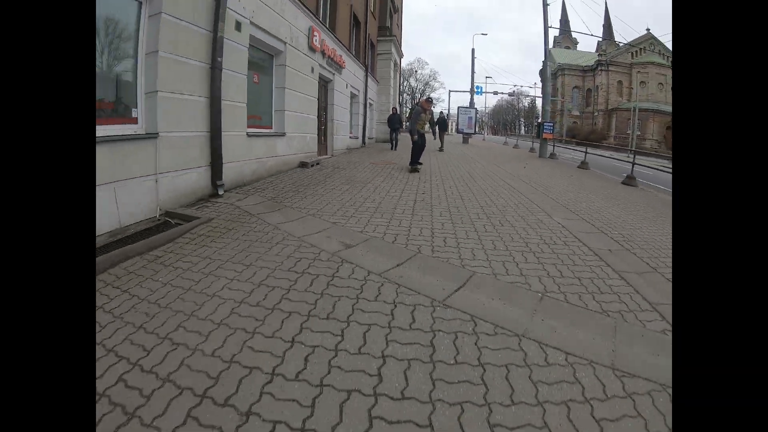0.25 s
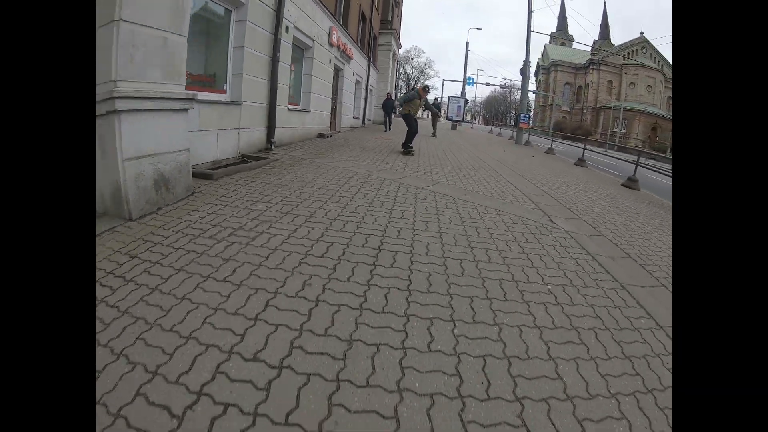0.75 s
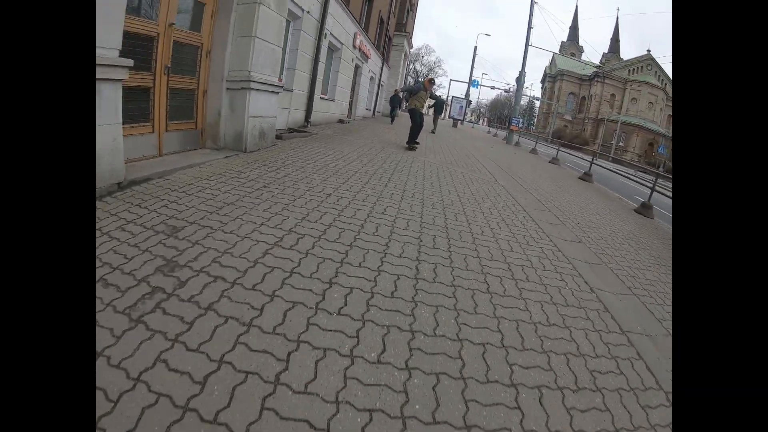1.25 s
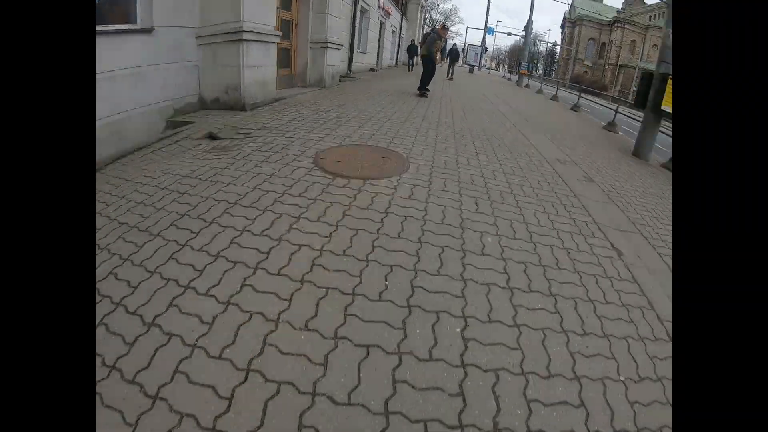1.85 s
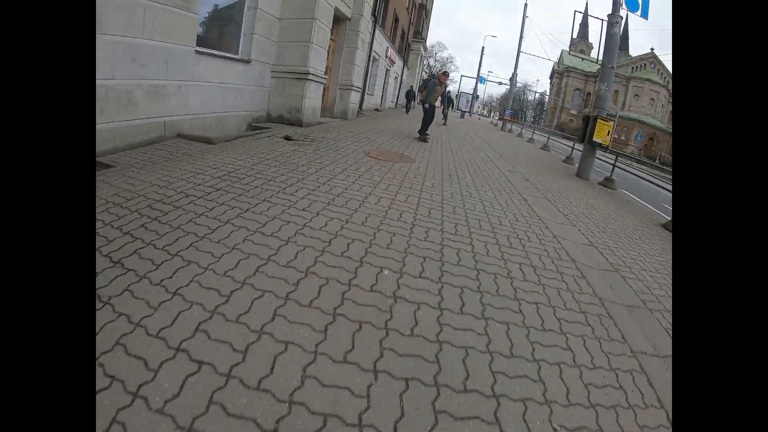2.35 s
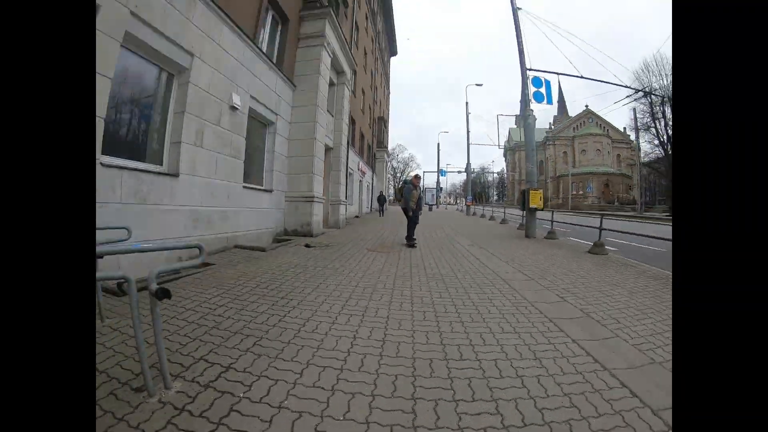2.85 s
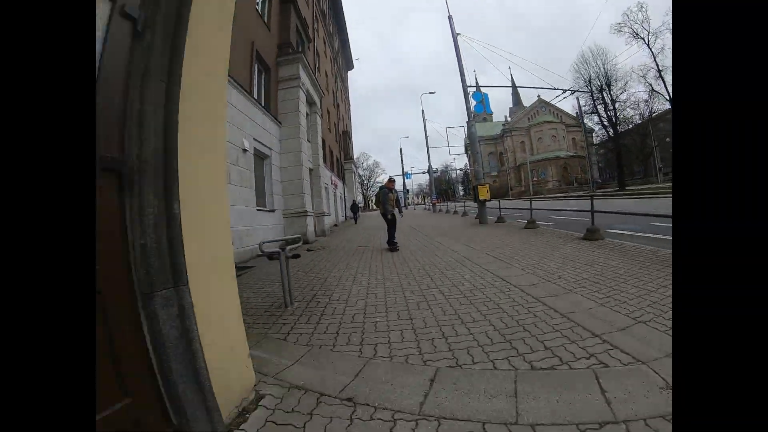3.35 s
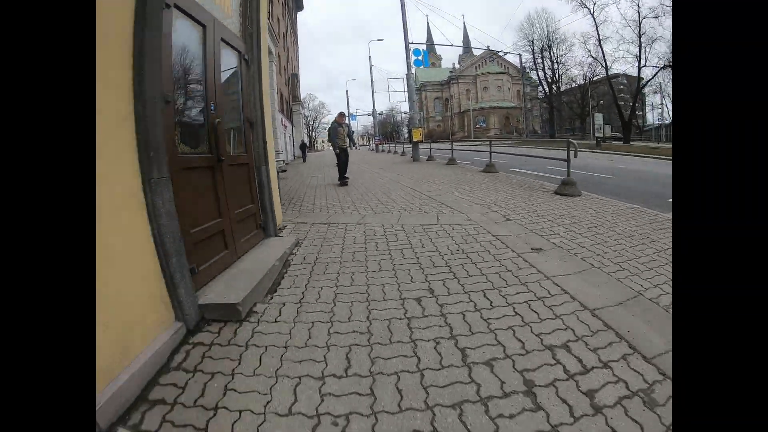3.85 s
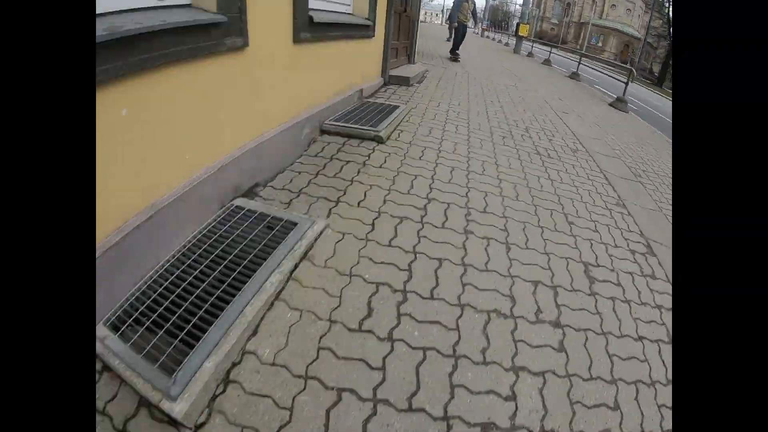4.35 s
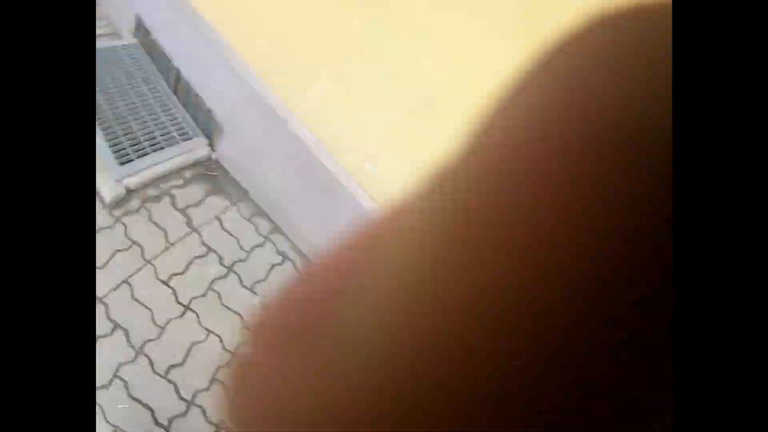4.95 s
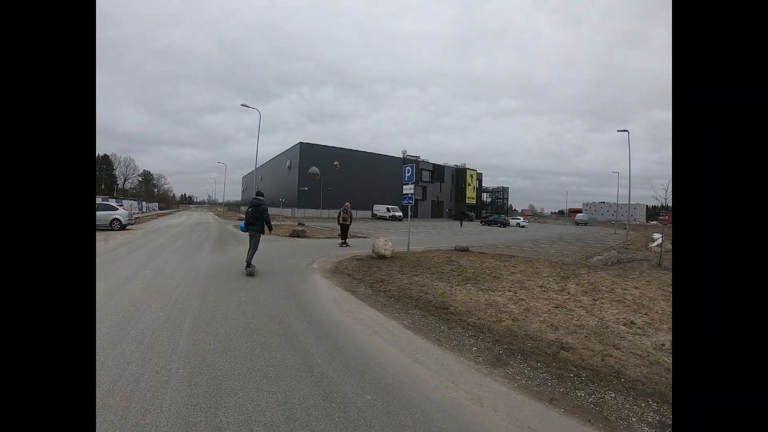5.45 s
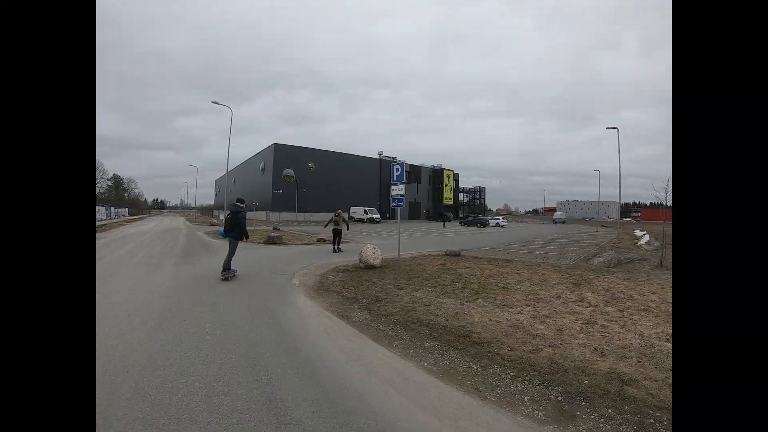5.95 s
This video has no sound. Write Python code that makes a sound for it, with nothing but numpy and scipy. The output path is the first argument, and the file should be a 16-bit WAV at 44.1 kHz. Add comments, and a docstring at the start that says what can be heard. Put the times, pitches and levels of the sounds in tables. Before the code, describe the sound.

Skateboard wheels rattle and roar fast over sidewalk pavers, fingers thump and muffle the microphone, then brief silence and smoother, quieter rolling on asphalt.

```python
"""Skateboard on pavers, then asphalt

A board rolls over concrete pavers, heard from the rider's hand: struck modes clack at the joints, shaped noise
roars, crackles and buffets, and resonances drum. Fingers thump and scrape the microphone housing as the
hand closes and the clatter dies away. After a short silence a board rolls on asphalt in mono: smoother
noise, with bumps, pings and a thin whistle.
"""
import sys
import numpy as np
from scipy import signal
from scipy.fft import rfft, irfft, next_fast_len
from scipy.io import wavfile
from scipy.ndimage import uniform_filter1d

SR = 44100
rng = np.random.default_rng(int(sys.argv[2]) if len(sys.argv) > 2 else 0)


def unload_audio(sound):
    """Save the sound as a 16-bit wav file, at the path given as the first command line argument."""
    columns = np.transpose(np.atleast_2d(sound))
    # keep every value between -1 and 1, then stretch to whole-number steps
    steps = np.round(np.clip(columns, -1, 1) * 32767)
    wavfile.write(sys.argv[1], SR, steps.astype(np.int16))


N = 273861
TIME = np.arange(N) / SR
CUT_S, RESUME_S = 5.152, 5.235   # pavers end, asphalt begins
TRAVEL_S = 0.0008   # mean delay from blow to sound

# hardest hits on raised paver joints: start_s, relative_clack_db, relative_crack_db
JOINTS = [(0.048,-11.5,-48), (0.13,-15,-51), (0.201,-14,-38), (0.252,-15,-45), (0.302,-18.5,-44),
          (0.483,-13.5,-48), (0.562,-15,-37), (0.59,-10,-41), (0.774,-12.5,-39), (0.832,-15,-44),
          (0.853,-12.5,-48), (0.88,-14.5,-54), (0.987,-11.5,-50), (1.043,-14.5,-48), (1.093,-12,-54),
          (1.147,-15,-51), (1.197,-12,-51), (1.22,-14.5,-43), (1.247,-13.5,-35), (1.296,-14,-38),
          (1.319,-11,-37), (1.348,-15.5,-44), (1.398,-13,-54), (1.449,-14,-34), (1.5,-14.5,-45),
          (1.55,-16,-33), (1.714,-14.5,-47), (1.766,-13,-51), (1.818,-17,-54), (1.925,-16.5,-40),
          (2.082,-12.5,-43), (2.161,-17,-36), (2.343,-14,-49), (2.373,-17.5,-48), (2.405,-10,-38),
          (2.446,-14,-45), (2.498,-11,-36), (2.556,-12.5,-45), (2.658,-9.5,-56), (2.762,-14.5,-48),
          (2.872,-11,-33), (2.91,-13,-43), (2.964,-14.5,-39), (3.246,-11.5,-41), (3.348,-9,-38),
          (3.398,-18,-46), (3.552,-15.5,-52), (3.707,-15,-49), (3.806,-16,-52), (3.855,-11,-43),
          (3.907,-14,-38), (3.959,-14.5,-42), (4.01,-14.5,-54), (4.112,-11.5,-39), (4.19,-11,-48),
          (4.255,-7.5,-37), (4.559,-14,-32), (4.611,-6.5,-47), (4.645,-11.5,-53)]
# rolling noise spectrum: frequency_hz, relative_density_db
ROLL_COLOUR = [(50, -10), (110, -2), (160, 0.5), (215, -4), (290, -2.5), (350, -9.5), (520, -9), (720, -10),
               (890, -6.5), (1230, -17), (1540, -16), (2000, -24), (2600, -39), (4500, -63.5)]


def from_db(db):
    """Decibels to amplitude gain."""
    return 10 ** (np.asarray(db) / 20)


def rms_one(x):
    """Scale to unit power."""
    return x / np.sqrt(np.mean(x ** 2) + 1e-20)


def gains(rows):
    """The dB columns of a timed curve as gains at every sample."""
    s, *columns = np.transpose(rows)
    return [from_db(np.interp(TIME, s, column)) for column in columns]


def at_hz(points, hz):
    """Interpolate a table on a log-frequency axis."""
    f, value = np.transpose(points)
    return np.interp(np.log(hz), np.log(f), value)


def ramp(t, start_s, length_s):
    """Linear rise from 0 to 1."""
    return np.clip((t - start_s) / length_s, 0, 1)


def drift(rate_hz):
    """Smooth random wander of unit power: noise through a double pole, at a reduced sample rate."""
    step, settle = 40, 2000
    pole = np.exp(-2 * np.pi * rate_hz * step / SR)
    white = rng.standard_normal(N // step + settle + 2)
    slow = signal.lfilter([1], [1, -2 * pole, pole * pole], white)[settle:]
    return np.interp(np.arange(N) / step, np.arange(len(slow)), rms_one(slow))


def lowpass(x, hz):
    """Second-order low-pass."""
    return signal.sosfilt(signal.butter(2, min(hz, .45 * SR), fs=SR, output="sos"), x + 1e-18)


def ring(force, hz, t60_s):
    """A two-pole mode: a unit click starts a decaying sine of initial height 1."""
    radius = from_db(-60 / (t60_s * SR))
    angle = 2 * np.pi * hz / SR
    return signal.lfilter([0, np.sin(angle)], [1, -2 * radius * np.cos(angle), radius ** 2], force + 1e-18)


def resonance(x, hz, width_hz):
    """A fixed band-pass resonance, at unit power."""
    return rms_one(signal.lfilter(*signal.iirpeak(hz, hz / width_hz, fs=SR), x))


def gliding(x, hz, width_hz):
    """A resonance whose centre moves: one pole in a rotating frame, at unit power."""
    turn = np.exp(2j * np.pi * np.cumsum(hz) / SR)
    slow = signal.lfilter([1], [1, -np.exp(-np.pi * width_hz / SR)], x / turn)
    return rms_one((turn * slow).real)


def clicks(times, sizes):
    """A train of single-sample blows."""
    out = np.zeros(N)
    np.add.at(out, np.clip(np.round(times * SR).astype(int), 0, N - 1), sizes)
    return out


def fading(blows, decay_s):
    """Each blow leaves an exponential tail."""
    return signal.lfilter([1], [1, -np.exp(-1 / (decay_s * SR))], blows + 1e-18)


def pan(lean_db):
    """Left and right gains of unit mean power from a left-right level difference."""
    g = from_db(np.array([[.5], [-.5]]) * lean_db)
    return g / np.sqrt(np.mean(g ** 2, axis=0))


def noise(spectrum, envelope=1, stereo=True):
    """Enveloped white noise, then coloured; channels partly alike, at unit power."""
    # channel correlation: frequency_hz, likeness_ratio
    likeness = [(50, 0.25), (100, 0.35), (200, 0.86), (520, 0.97), (850, 0.6), (1500, 0.43), (2300, 0.19),
                (6500, 0.25)]
    size = next_fast_len(N)
    hz = np.maximum(np.arange(size // 2 + 1) * SR / size, 1)
    mid, side = rfft(rng.standard_normal((2, N)) * envelope, size) * from_db(at_hz(spectrum, hz))
    if stereo:
        alike = np.clip(at_hz(likeness, hz), -1, 1)
        mid = np.sqrt(1 + alike) * mid + np.sqrt(1 - alike) * side * [[1], [-1]]
    return rms_one(irfft(mid, size)[..., :N])


def strike(times, level_db, scatter_db, contact_hz):
    """A blow pushes all board modes one way; bending waves reach each at its own moment and strength."""
    # board modes: frequency_hz, relative_level_db, t60_s
    board = [(144.4, -10.5, 0.06), (284, -14, 0.034), (469, -9.5, 0.036), (650, -8, 0.036),
             (828, 0.5, 0.017), (960, -4, 0.014), (1466, -7.5, 0.011), (2060, -12, 0.0036)]
    travel_spread_s = .00014
    out, sign = np.zeros(N), np.sign(rng.standard_normal(len(times)))
    for hz, mode_db, t60_s in board:
        strength, travel = rng.standard_normal((len(times), 2)).T
        sizes = from_db(level_db + mode_db + scatter_db * strength) * sign
        arrivals = times + TRAVEL_S + travel_spread_s * travel
        out += ring(clicks(arrivals, sizes), hz, t60_s)
    return lowpass(out, contact_hz)


def pavers():
    """Joints ring the board in clacks and rebounds; each blow swells the roar, drumming, rasp and grit."""
    # steady roar colour shared above; grit spectrum: frequency_hz, relative_density_db
    grit_colour = [(2500, -16), (3900, -9.5), (5000, -2.5), (6100, 2.5), (7000, -2.5), (8000, -10.5),
                   (10000, -19), (14000, -47.5)]
    # rougher and smoother paving: start_s, hiss_change_db
    surface_curve = [(0.03, 2.5), (0.3, -1), (0.6, 5), (0.78, 3), (0.9, -1), (1.05, 0), (2.05, 3.5),
                     (2.7, 2.5), (3.1, 3), (4.03, -0.5), (4.35, 4)]
    # loose grains on the paving: start_s, crackle_db
    crackle_curve = [(0, -51.5), (1.4, -78), (2.8, -66.5), (3.0, -57), (3.13, -45), (3.26, -63),
                     (3.48, -48.5), (3.7, -54.5), (4.8, -55.5)]
    # wheels' rasp around 2-3 kHz: start_s, level_db
    rasp_curve = [(0, -51), (1.1, -48), (1.5, -50), (2.2, -47), (2.75, -52), (2.85, -48.5), (3.3, -45.5),
                  (3.55, -51), (4.1, -48.5), (4.55, -48), (4.8, -46)]
    # hand dropping and closing: start_s, clatter_change_db, hiss_change_db
    cover_curve = [(4.25, -1, -1.5), (4.6, -5, -1.5), (4.66, -7, -3.5), (4.73, -16.5, -11.5),
                   (4.84, -17, -9.5), (4.91, -25.5, -17), (5.0, -37, -23), (5.07, -43, -15),
                   (5.13, -31, -21)]
    rasp_colour = [(1200, -15.5), (2100, 0.0), (3100, -1.0), (4200, -13.0), (7000, -38.0)]
    roar_db, grit_db = -23.5, -47   # before surface and hand changes
    roar_follows = 0.79   # share of the surface swing
    gap_db, gap_s = -6, 0.0077   # a wheel is unloaded crossing the gap before a hard edge
    drop_s, drop_time_s = 4.04, 0.16   # the hand drops towards the deck
    clack_drop_db, roar_drop_db = -5.5, -1.3

    hard, hard_db, _ = np.transpose(JOINTS)
    light, light_db = light_joints(hard)
    times, blow_db = np.append(hard, light), np.append(hard_db, light_db)
    heard_db = blow_db + clack_drop_db * ramp(times, drop_s, drop_time_s)
    clacks = strike(times, heard_db + 1.0, scatter_db=0.5, contact_hz=2000)
    rebound_times = times + rng.uniform(0.00097, 0.00455, len(times))
    rebounds = strike(rebound_times, heard_db - 7.5, scatter_db=3.5, contact_hz=1790)

    jolt = fading(clicks(times, from_db(blow_db - blow_db.mean())), decay_s=0.0014)
    climb = uniform_filter1d(jolt, int(0.0051 * SR))   # a wheel takes a moment to ride over the edge
    gap = fading(clicks(hard, np.ones(len(hard)))[::-1], decay_s=gap_s)[::-1]   # grows towards the edge
    load = rms_one((1 + 2.5 * climb) * from_db(1.66 * drift(25) + gap_db * gap))
    surface, = gains(surface_curve)
    roar_level = from_db(roar_db + roar_drop_db * ramp(TIME, drop_s, drop_time_s)) * surface ** roar_follows
    roar = roar_level * noise(ROLL_COLOUR, load)

    crunch = (1 + 1.3 * climb) * from_db(2.6 * drift(22) + 1.9 * drift(350))
    grit = from_db(grit_db) * noise(grit_colour, crunch)
    crackle = gains(crackle_curve)[0] * crushed_grains(crunch)
    rasp = gains(rasp_curve)[0] * noise(rasp_colour, crunch)

    clatter_gain, hiss_gain = gains(cover_curve)
    clatter = clacks + rebounds + rattle() + roar + deck(load) + boom(load)
    return clatter_gain * clatter + hiss_gain * surface * (rasp + grit + crackle)


def light_joints(hard):
    """Joints between hard hits come at a near-steady pace, weak and strong in turn."""
    joints_per_s, jitter_s = 38.7, .0007   # pavers are not laid quite evenly
    light_db, alternate_db, uneven_db = -19, 1.5, 1.1
    steps = np.maximum(np.round(np.diff(hard) * joints_per_s), 1).astype(int)
    rows = []
    for a, b, n in zip(hard, hard[1:], steps):
        rows += [(a + (b - a) * k / n, (-1) ** k) for k in range(1, n)]
    times, turn = np.transpose(rows)
    late, size = rng.standard_normal((len(times), 2)).T
    return times + jitter_s * late, light_db + alternate_db * turn + uneven_db * size


def crushed_grains(pressure):
    """Single grains of very unequal size crack under the wheels as short noise bursts."""
    colour = [(3000, -19.5), (6500, 6.5), (9000, -2.5), (11500, -12.0), (13000, -14.5), (16000, -26.5)]
    grains_per_s = 900
    snaps = (rng.random(N) < grains_per_s / SR) * from_db(2.9 * np.minimum(rng.exponential(1, N), 5))
    return noise(colour, pressure * fading(snaps, decay_s=0.0005))


def rattle():
    """Loose trucks and rough paver faces knock the board modes at random times."""
    knocks_per_s, floor_db, range_db = 70, -26, 6
    when, size = rng.random((int(knocks_per_s * CUT_S), 2)).T
    return strike(when * CUT_S, floor_db + range_db * size, scatter_db=3.5, contact_hz=1880)


def deck(load):
    """Wheel load drums two bending modes; they waver together and climb as the hand drops."""
    # bending modes: start_s, lower_hz, lower_db, upper_hz, upper_db
    modes = [(0, 458.5, -20.5, 613, -32), (2.4, 443, -20.5, 595, -44.5), (4.1, 448.6, -22, 578, -30.5),
             (4.3, 453, -23, 600, -22.5), (4.5, 477, -20, 587, -22), (4.65, 504, -25, 628, -23)]
    # drive spectrum: frequency_hz, relative_density_db
    drive = [(150, -19), (380, -2), (660, 1.5), (820, -18), (2500, -32.5)]
    s, low_hz, low_db, high_hz, high_db = np.transpose(modes)
    waver = 1 + 0.01 * drift(4.4)
    lower = gliding(noise(drive, load), np.interp(TIME, s, low_hz) * waver, width_hz=43)
    upper = gliding(noise(drive, load), np.interp(TIME, s, high_hz) * waver, width_hz=170)
    return from_db(np.interp(TIME, s, low_db)) * lower + from_db(np.interp(TIME, s, high_db)) * upper


def boom(load):
    """The board bounces on its bushings: a low resonance of wandering pitch."""
    # bounce resonance: start_s, pitch_hz, level_db
    bounce = [(0, 150, -42), (1.2, 153, -33), (2.3, 127, -25.5), (3.0, 140.3, -30.5), (3.8, 173.3, -25),
              (4.4, 166.6, -36)]
    s, hz, db = np.transpose(bounce)
    tone = gliding(noise(ROLL_COLOUR, load), np.interp(TIME, s, hz), width_hz=38)
    return from_db(np.interp(TIME, s, db)) * tone


def wind():
    """Lumpy buffeting noise, mostly separate at each port in its lows, and a rumble in the closing hand."""
    # wind at the microphone: start_s, level_db
    buffet_curve = [(0, -13.5), (0.17, -23.5), (0.62, -18.5), (0.96, -21.5), (1.4, -21.5), (2.4, -26.5),
                    (3.9, -26.5), (4.3, -19), (4.95, -26), (5.14, -31.5)]
    # wind spectrum: frequency_hz, relative_density_db
    colour = [(12, -19), (25, -7), (40, -4.5), (72, -4), (110, -8.5), (180, -13.5), (500, -30),
              (2000, -47.5), (8000, -87.5)]
    # resonance of the hand's hollow: start_s, pitch_hz, level_db
    hollow = [(4.15, 75.6, -55), (4.27, 72, -30), (4.55, 71, -15), (4.66, 61.2, -26), (4.76, 48.1, -21),
              (5.1, 40, -36)]
    s, hz, db = np.transpose(hollow)
    rumble = from_db(np.interp(TIME, s, db)) * gliding(noise(colour), np.interp(TIME, s, hz), width_hz=8.4)
    buffets = gains(buffet_curve)[0] * noise(colour, from_db(1.0 * drift(16.0)))
    return buffets * pan(-2.9) + rumble * pan(-7.5)


def cracks():
    """A wheel meeting a sharp paver edge adds a very short bright noise burst to the clack."""
    colour = [(600, -7.5), (1500, 8.5), (2100, 8.5), (2700, -4.0), (3300, -4.0), (4300, -13.5),
              (6200, -3), (9000, -32.5), (14000, -55)]
    times, _, crack_db = np.transpose(JOINTS)
    burst = fading(clicks(times + TRAVEL_S, from_db(crack_db + 7.0)), decay_s=0.0048)
    return burst * noise(colour)


def stones():
    """Stones snap under a wheel as short bright noise bursts."""
    # snaps: start_s, relative_level_db
    snaps = [(2.4955, -31.5), (2.516, -30.5), (2.5852, -40.5), (2.7056, -33.5), (2.897, -32.5),
             (2.908, -31), (3.072, -34.5), (3.1279, -38), (3.1604, -34), (3.1913, -36), (3.4317, -32),
             (3.5545, -40.5), (3.598, -36.5), (3.7525, -37), (4.103, -30), (4.353, -26.5), (4.494, -30)]
    colour = [(1500, -15), (4000, -3.0), (6800, 13.5), (9000, -10.0), (15000, -27)]
    times, level_db = np.transpose(snaps)
    burst = fading(clicks(times, from_db(level_db + 2.0)), decay_s=0.0036)
    return burst * noise(colour)


def fingers():
    """The shifting grip thumps the housing; each slip rings its modes and scrapes across it."""
    # grip thumps: start_s, relative_level_db, pitch_hz
    grip = [(4.434, -3.5, 68.9), (4.521, -8, 68.4), (4.613, -10, 67), (4.77, -11, 100), (4.875, -8, 92),
            (4.938, -7, 66.5), (5.061, -19, 72)]
    # slips: start_s, relative_knock_db, relative_scrape_db, scrape_decay_s, scrape_top_hz
    slips = [(4.777, -29.5, -32, 0.02, 12000), (4.876, -32, -38, 0.0086, 9000),
             (4.943, -31, -29.5, .009, 3480), (5.069, -40, -41.5, 0.011, 5000)]
    # housing modes: frequency_hz, relative_level_db, t60_s
    housing = [(904, -3, 0.02), (1590, -5.5, 0.025), (1960, -7, 0.02), (4050, -22, 0.022)]
    second_tap_s = 0.0099   # a slipping finger catches twice
    rub_colour = [(600, 6.5), (1500, 6.5), (6500, -6.5), (15000, -19)]
    thumps = sum(ring(clicks(np.array([s]), from_db(db)), hz, t60_s=0.13) for s, db, hz in grip)
    rub = noise(rub_colour, from_db(3.6 * drift(250)))
    scrapes = 0
    for s, _, db, decay_s, top_hz in slips:
        envelope = fading(clicks(np.array([s]), from_db(db)), decay_s)
        scrapes = scrapes + lowpass(rub * envelope, top_hz)
    times, knock_db = np.transpose(slips)[:2]
    taps = clicks(times, from_db(knock_db)) + clicks(times + second_tap_s, from_db(knock_db))
    knocks = sum(from_db(db) * ring(taps, hz, t60_s) for hz, db, t60_s in housing)
    return (lowpass(thumps, hz=190) + knocks) * pan(-13.0) + scrapes


def asphalt():
    """Fine texture makes mono roar and growing hiss; bumps strike the board and ping the axle; a whistle fades."""
    # roar: start_s, level_db
    roar_curve = [(5.3, -24), (5.42, -23), (5.52, -19.5), (5.7, -24.5), (5.9, -23), (6.2, -22)]
    # bumps: start_s, relative_level_db, relative_tick_db
    bump_table = [(5.582, -25, -45), (5.764, -21, -47), (5.818, -20, -41), (5.831, -20, -44),
                  (5.924, -17.5, -49), (6.014, -22, -34.5)]
    # roar spectrum: frequency_hz, relative_density_db
    roar_colour = [(20, 1), (60, 2), (150, 2.5), (210, -1.5), (300, 3.5), (390, -11), (470, -2), (545, -7),
                   (620, 1.5), (790, -12), (980, -8.5), (1270, -17.5), (1560, -17), (2050, -24),
                   (3000, -61)]
    # tread hiss spectrum: frequency_hz, relative_density_db
    hiss_colour = [(2000, -18), (3200, -11), (3900, -2), (4400, 0), (5100, -5), (6000, -4), (7300, -20),
                   (8200, -12), (9500, -26), (11000, -60)]
    tick_colour = [(800, -6), (1800, 7), (3000, -13), (5500, -2), (8000, -27)]
    tread_db, tread_rise_db_per_s = -60, 8.5   # level when the road begins, and its growth

    times, level_db, tick_db = np.transpose(bump_table)
    swell = 1 + fading(clicks(times, from_db(level_db - level_db.mean())), decay_s=0.0054)
    texture = from_db(1.6 * drift(50) + 1.0 * drift(300)) * swell
    roar = gains(roar_curve)[0] * noise(roar_colour, texture, stereo=False)
    tread_gain = from_db(tread_db + tread_rise_db_per_s * (TIME - RESUME_S))
    tread = tread_gain * noise(hiss_colour, texture, stereo=False)
    bumps = strike(times, level_db, scatter_db=-0.5, contact_hz=1900)

    pitch_hz, width_hz = 2730, 40
    narrow = resonance(rng.standard_normal(N), pitch_hz, width_hz)
    whistle = from_db(-67) * resonance(narrow, pitch_hz, width_hz)
    whistle = whistle * np.interp(TIME, [5.25, 5.5, 5.8], [.6, 1, .25])

    snaps = clicks(times + TRAVEL_S, from_db(tick_db))
    ticks = fading(snaps, decay_s=0.0039) * noise(tick_colour, stereo=False)
    high_ping = from_db(-0.5) * ring(snaps, hz=4470, t60_s=0.029)
    low_ping = from_db(15.5) * ring(snaps, hz=1560, t60_s=0.026)
    road = roar + tread + ticks + high_ping + low_ping + bumps + whistle
    return signal.sosfilt(signal.butter(10, 9300, fs=SR, output="sos"), road)


def ports(x):
    """Sound from below bends round the housing to two ports with different level and phase."""
    # level difference: frequency_hz, left_minus_right_db
    lean = [(140, -4), (300, -3.5), (480, -7.5), (820, -14.5), (1400, -8), (2600, -4), (5500, -0.5),
            (8000, -2.5)]
    # phase difference: frequency_hz, left_lead_rad
    left_leads = [(300, 0), (660, 0.4), (950, 1.12), (1460, 0.95), (2330, -1), (2760, -4), (4400, -7.5),
                  (5300, -9)]
    size = next_fast_len(N + SR // 10)
    hz = np.maximum(np.arange(size // 2 + 1) * SR / size, 1)
    turn = np.exp(1j * at_hz(left_leads, hz) * np.array([[1], [0]]))
    return irfft(rfft(x, size) * pan(at_hz(lean, hz)) * turn, size)[:, :N]


def scene():
    """The sidewalk stops dead; after a silence the road fades in."""
    sidewalk = ports(pavers() + cracks() + stones()) + fingers() + wind()
    sidewalk = sidewalk * np.clip((CUT_S - TIME) / 0.00098, 0, 1)
    return sidewalk + asphalt() * ramp(TIME, RESUME_S, length_s=0.071)


def record(dry):
    """Soft saturation rounds the highest peaks; a steep low-pass cuts the top."""
    ceiling, cutoff_hz = .85, 15800
    rounded = dry / (1 + (dry / ceiling) ** 6) ** (1 / 6)
    return signal.sosfilt(signal.ellip(10, .1, 80, cutoff_hz, fs=SR, output="sos"), rounded)


dry = scene()
out = record(dry)
unload_audio(out)
```